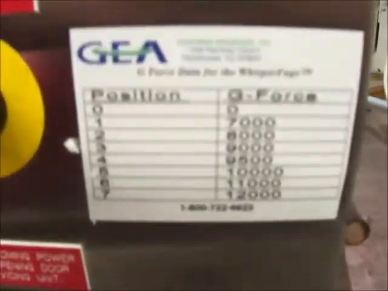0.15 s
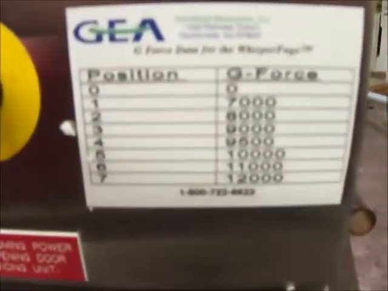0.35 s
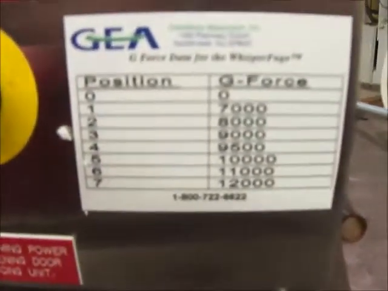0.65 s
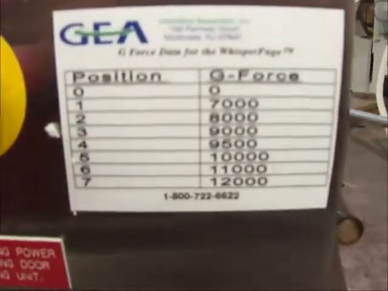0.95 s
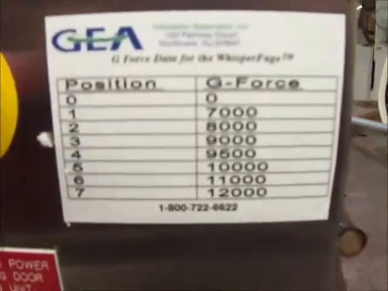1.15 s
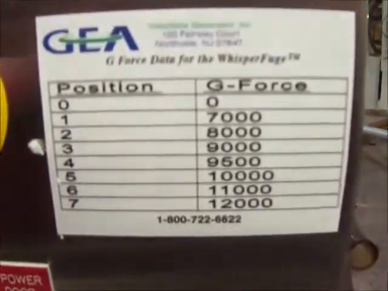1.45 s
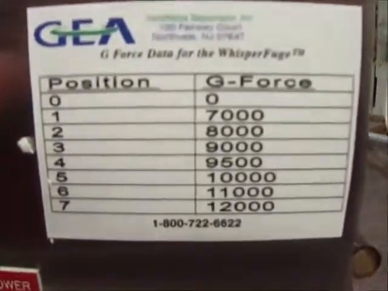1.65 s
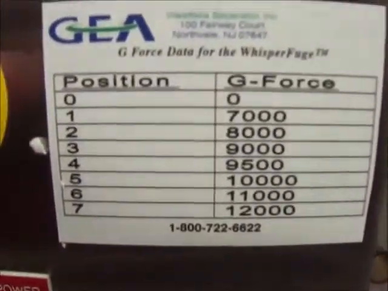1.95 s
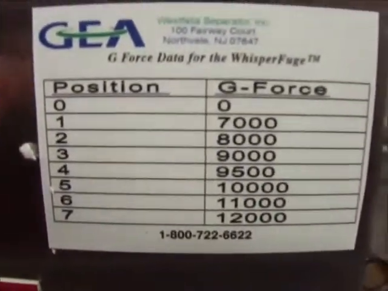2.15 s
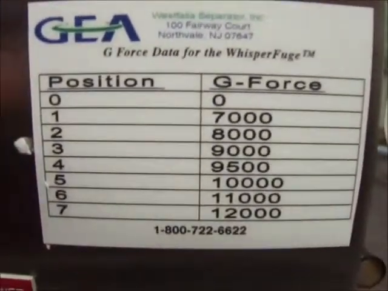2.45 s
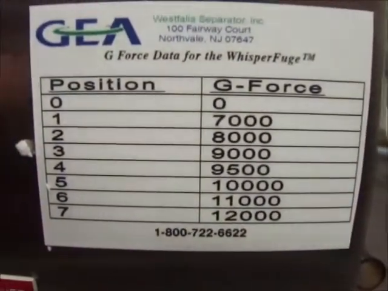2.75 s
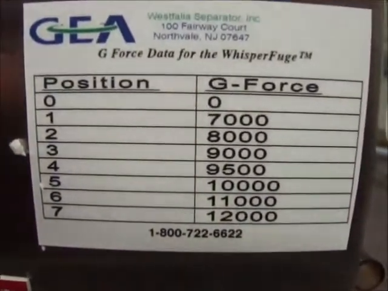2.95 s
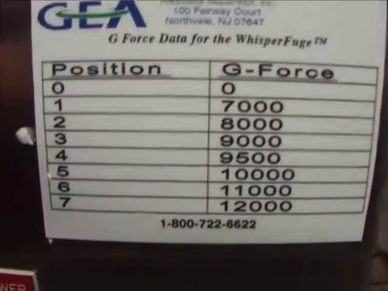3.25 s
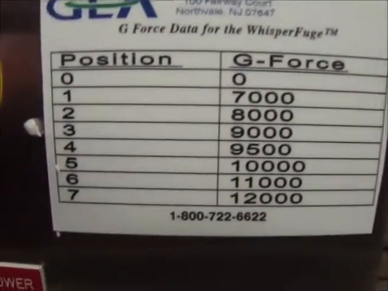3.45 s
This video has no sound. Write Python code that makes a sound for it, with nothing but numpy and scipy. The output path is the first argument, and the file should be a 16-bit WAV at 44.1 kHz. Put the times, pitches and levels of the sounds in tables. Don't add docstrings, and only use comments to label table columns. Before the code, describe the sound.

Continuous loud centrifuge noise, heard close up in an industrial hall with little deep bass; hum and hissing spray stay constant while churning surges, an air duct whistles briefly, and liquid surges again near the end.

```python
import sys
import numpy as np
from scipy import signal
from scipy.fft import rfft, irfft
from scipy.io import wavfile
from scipy.ndimage import uniform_filter1d

SR = 44100
rng = np.random.default_rng(int(sys.argv[2]) if len(sys.argv) > 2 else 0)


def file_out(sig):
    cols = np.atleast_2d(sig).T
    lim = np.clip(cols, -1, 1)
    pcm = np.round(lim * 32767).astype(np.int16)
    wavfile.write(sys.argv[1], SR, pcm)


def field_ratio(decibels):
    return 10 ** (np.asarray(decibels, dtype=float) / 20)


N = 158760
T = np.arange(N) / SR
F = np.maximum(np.fft.rfftfreq(N, 1 / SR), 1)
BOWL_HZ, MOTOR_HZ = 199.92, 29.94


def unit(x):
    return x / np.sqrt(np.mean(x ** 2))


def curve(rows, order=1):
    return np.interp(T, np.array(rows)[:, 0], np.array(rows)[:, order])


def noise():
    return rng.standard_normal(N)


def ring(x, hz, width_hz):
    detuning = (F / hz - hz / F) * hz / width_hz
    return irfft(rfft(x) / (1 + 1j * detuning) ** 2, N)


def walk(rate_hz):
    hold = int(SR / rate_hz)
    steps = np.repeat(rng.standard_normal(N // hold + 1), hold)
    smooth = uniform_filter1d(uniform_filter1d(steps, hold), hold)[:N]
    return unit(smooth - smooth.mean())


def tones(rows, wander_db, drift_rad):
    out = np.zeros(N)
    for hz, db in rows:
        level = np.sqrt(2) * field_ratio(db + wander_db * walk(4.38))
        phase = 2 * np.pi * (hz * T + rng.random()) + drift_rad * walk(3.03)
        out += level * np.sin(phase)
    return out


def rumble():
    return field_ratio(-60.5) * unit(ring(noise(), 69, 50))


# t/s, low f/Hz, high f/Hz, level/dB
PUFFS = [(.285, 4230, 5250, -39), (1.005, 6170, 7700, -39), (1.283, 5130, 6300, -41),
         (1.655, 8250, 9750, -42), (2.305, 6800, 8350, -40), (3.0, 4270, 5250, -38), (3.0, 8200, 9750, -42),
         (3.6, 5100, 7440, -36)]


def puffs():
    half_length_s = .017
    out = np.zeros(N)
    for s, low_hz, high_hz, db in PUFFS:
        band = (F > low_hz) & (F < high_hz)
        hiss = unit(irfft(rfft(noise()) * band, N))
        out += field_ratio(db) * hiss * np.exp(-((T - s) / half_length_s) ** 4)
    return out * np.array([[1], [-1]])


# f/Hz, level per Hz/dB
ROAR = [(200, -5.5), (350, 0.5), (540, -2), (1100, -2), (2300, -3), (4500, -4), (6000, -9), (11000, -10.5)]


def roar():
    swell_db, flicker_db = 0.33, 1
    hz, db = np.array(ROAR).T
    air = rfft(noise()) * field_ratio(np.interp(np.log(F), np.log(hz), db))
    swell = walk(1.4)
    out = np.zeros(N)
    for k in range(-20, 26):
        distance = np.clip(6 * np.log2(F / 700) - k, -1, 1)
        band = np.cos(distance * np.pi / 2) ** 2
        out += irfft(air * band, N) * field_ratio(swell_db * swell + flicker_db * walk(8.86))
    return field_ratio(-22.5) * unit(out)


# f/Hz, width/Hz, level/dB
HOOD = [(5250, 900, -40), (6750, 940, -41.5), (7800, 550, -43.5), (8670, 400, -46.5), (9940, 640, -41),
        (10570, 280, -43.5)]


def hood():
    out = np.zeros(N)
    for hz, width_hz, db in HOOD:
        out += field_ratio(db + 1.0 * walk(5)) * unit(ring(noise(), hz, width_hz))
    return out


# t/s, f/Hz, level/dB
DUCT = [
    (0, 2850, -43),
    (.4, 2880, -50),
    (.58, 2760, -46),
    (.68, 2830, -38),
    (.95, 2760, -30),
    (1.1, 2780, -47),
    (1.35, 2800, -37),
    (2.2, 2826, -44),
    (2.9, 2840, -39),
    (3.2, 2790, -46),
]


def duct():
    width_hz = 35
    breath = uniform_filter1d(rng.standard_normal((2, N)), int(SR / width_hz), axis=1)
    breath = unit(breath)
    phase = 2 * np.pi * np.cumsum(curve(DUCT)) / SR
    return field_ratio(curve(DUCT, order=2)) * (breath[0] * np.sin(phase) + breath[1] * np.cos(phase))


# t/s, liquid churning level/dB, bearing load level/dB, spray level/dB
LOAD = [(0, -2, 3, 0), (.15, -2, 4, -1), (.35, -4.5, 5.5, -1.5), (.55, 2, -5, -1.5), (.72, -7, 4, -1.5),
        (.9, 1, -4, -1.5), (1.3, -2, 2, -1), (1.55, -2, 4, -0.5), (1.75, -0.5, 1, -1.5),
        (2.1, -1.5, 1.5, -0.7), (2.5, 0, 2.5, -1), (2.85, -0.5, 1.5, -1), (3.1, -4, 0, -1),
        (3.45, 4, 0, -1), (3.6, -5, -6, -2.5)]


def airborne():
    vane_depth, motor_depth = .03, .02
    vanes = vane_depth * np.sin(4 * np.pi * BOWL_HZ * T)
    motor_ruffle = motor_depth * np.sin(2 * np.pi * MOTOR_HZ * T)
    spray = field_ratio(curve(LOAD, order=3)) * (roar() + hood())
    return (1 + vanes + motor_ruffle) * spray + duct()


def slaps():
    slaps_per_s, decay_s, scatter_db = 70, .005, 1.8
    chance = rng.random((300, 2))
    at = np.cumsum(-np.log(chance[:, 0]) / slaps_per_s * SR).astype(int)
    inside = at < N
    hits = np.zeros(N)
    hits[at[inside]] = field_ratio(-scatter_db * np.log(chance[inside, 1]))
    return unit(signal.fftconvolve(hits, np.exp(-T[:4000] / decay_s))[:N])


# f/Hz, width/Hz
CASING = [(160, 70), (455, 100), (578, 45), (712, 70), (858, 85), (1030, 48), (1230, 65), (1315, 75),
          (1440, 115), (1645, 100), (1845, 90), (1995, 100), (2780, 450), (3390, 260)]
CASING_DB = [-43.5, -35, -40, -38, -34, -38, -38.5, -38.5, -37, -37.5, -40, -41.5, -37.5, -43]


def casing():
    slap_top_hz, slap_share = 1250, .35
    slap_power = slaps() ** 2
    out = np.zeros(N)
    for (hz, width_hz), db in zip(CASING, CASING_DB):
        reach = 1 / (1 + (hz / slap_top_hz) ** 2)
        unevenness = np.sqrt(1 + slap_share * reach * (slap_power - 1))
        shake = unevenness * field_ratio(reach * curve(LOAD))
        out += field_ratio(db + 0.29 * walk(3.47)) * unit(ring(shake * noise(), hz, width_hz))
    return out


# t/s, level/dB, share of the lower note (0-1)
THUDS = [(0.129, 0, 0.3), (0.192, -2, 0.2), (0.525, -4, 0.25), (0.864, -1, 0.74), (1.166, -4.5, 0.1),
         (1.327, -1, 0.56), (1.723, -3, 0.4), (2.519, -18, 0.8), (2.83, -3, 0.9), (3.398, -19, 0.3),
         (3.459, -1, 0.1)]
THUD_HZ = (705, 865)


def thuds():
    length_s, level_db = .003, -10.5
    low, high = (2 * np.pi * hz for hz in THUD_HZ)
    out = np.zeros(N)
    for s, db, share in THUDS:
        edge = np.exp(-((T - s - length_s / 2) / length_s) ** 2)
        note = share * np.sin(low * (T - s)) + (1 - share) * np.sin(high * (T - s))
        out += field_ratio(db + level_db) * edge * note
    return out


# t/s, level/dB
THROB = [
    (0.0, -71),
    (0.04, -58),
    (0.48, -56),
    (1.02, -68),
    (1.63, -44),
    (2.14, -57),
    (2.51, -50),
    (2.7, -60),
    (3.6, -52),
]


def throb():
    return np.sqrt(2) * field_ratio(curve(THROB) + 20) * np.sin(2 * np.pi * 83.4 * T)


# f/Hz, level/dB
PUMP = [(123, -52), (247, -47), (283.6, -51), (314.9, -52), (691.1, -42), (703.2, -48), (1240.9, -46),
        (1326.6, -46), (1606.9, -47), (1636.9, -47), (1670.8, -49), (1836.7, -51), (1950.1, -44),
        (2155.7, -52)]


def pump():
    return field_ratio(.1) * tones(PUMP, wander_db=0.5, drift_rad=0.5)


# f/Hz, level/dB
BEARING = [(2778.5, -50), (2845, -54), (2893, -51), (2926.8, -48), (3032.8, -45), (3095.1, -48),
           (3246.8, -50), (3492.4, -50), (3567.8, -51), (3591.0, -51), (3643.5, -49), (3708.1, -48),
           (3771.3, -46), (3838, -52),
           (4112.8, -50), (4176.1, -52), (4241.4, -52), (4305.0, -52), (4436.8, -49), (4588.3, -50),
         (5039.1, -54), (6997.3, -48), (7095.2, -53), (7883.8, -53), (8000.6, -57), (8234.4, -58),
         (9420.8, -58), (10468.8, -57)]
# f/Hz, level/dB
SQUEAL = [(3886.1, -43), (4037.5, -44.5), (4059.0, -43.5)]


def bearings():
    squeal = field_ratio(curve(LOAD, order=2)) * tones(SQUEAL, wander_db=0.8, drift_rad=0.86)
    return squeal + field_ratio(-0.6) * tones(BEARING, wander_db=1.4, drift_rad=0.88)


# multiple of the turn, level/dB
MOTOR = [(16, -43), (19, -47), (21, -49), (28, -43), (29, -45), (30, -46), (34, -50), (41, -48), (43, -48),
         (48, -43), (50, -49), (54, -40), (55, -48), (58, -52)]


def motor():
    rows = [(k * MOTOR_HZ, db) for k, db in MOTOR]
    return field_ratio(-2.1) * tones(rows, wander_db=1.5, drift_rad=0.55)


# bowl multiple, level/dB
BEATS = [(2, -45), (4, -44), (5, -52), (7, -51)]


def beats():
    rows = [(k * BOWL_HZ + MOTOR_HZ, db) for k, db in BEATS]
    return tones(rows, wander_db=5.0, drift_rad=0.21)


# multiple of the turn, level/dB
BOWL = [(1, -30), (2, -24.5), (3, -36.5), (4, -26.5), (5, -36.5), (6, -39.5), (7, -39.5), (8, -38),
        (9, -42.5)]


def bowl():
    rows = [(k * BOWL_HZ, db) for k, db in BOWL]
    return tones(rows, wander_db=0.41, drift_rad=0.027)


def scene():
    rotors = throb() + pump() + bearings() + motor() + beats() + bowl()
    mono = airborne() + casing() + thuds() + rotors
    return np.array([mono, mono])


def low_pass(x):
    return signal.sosfilt(signal.butter(12, 11130, fs=SR, output="sos"), x)


def record(dry):
    low_hz, top_hz = 139, 11010
    mic = (F < top_hz) / np.sqrt(1 + (low_hz / F) ** 10.5)
    mix = irfft(rfft(dry, axis=1) * mic, N, axis=1) + rumble() + puffs()
    return low_pass(mix)


dry = scene()
out = record(dry)
file_out(out)
```